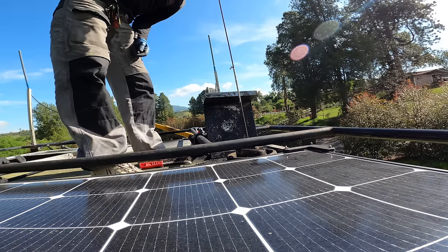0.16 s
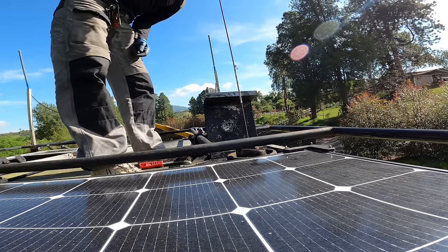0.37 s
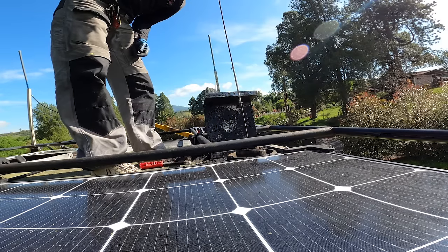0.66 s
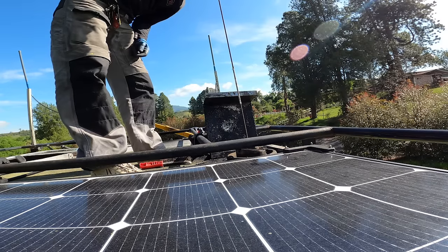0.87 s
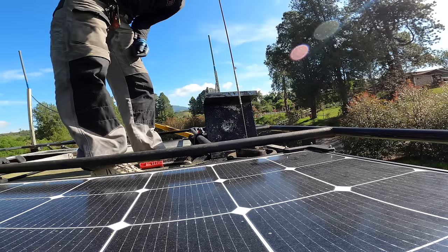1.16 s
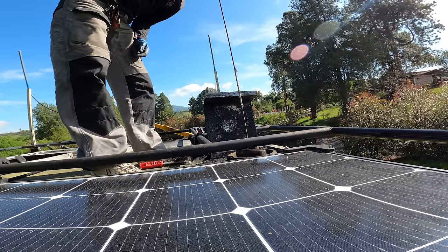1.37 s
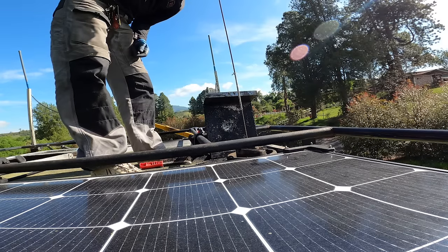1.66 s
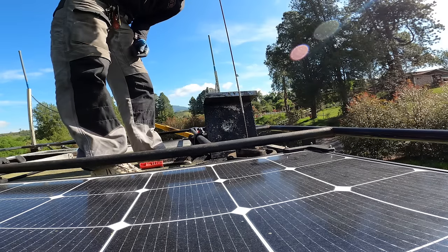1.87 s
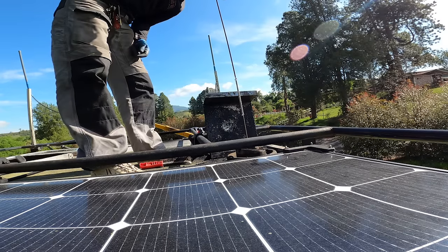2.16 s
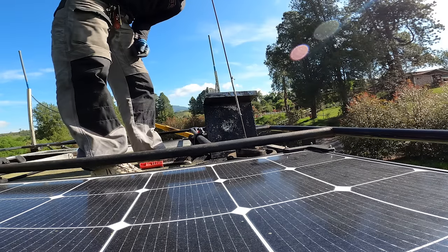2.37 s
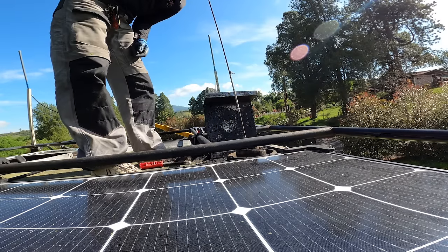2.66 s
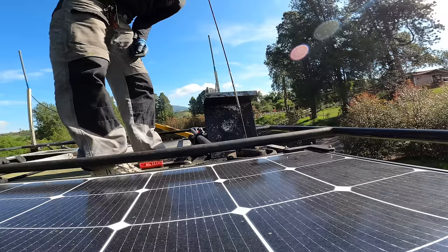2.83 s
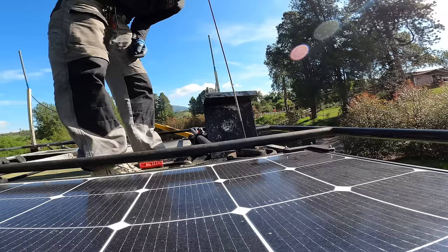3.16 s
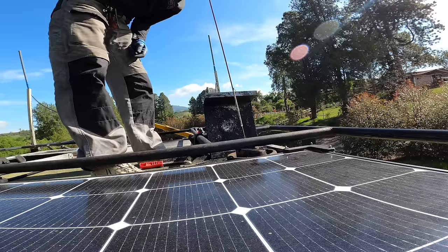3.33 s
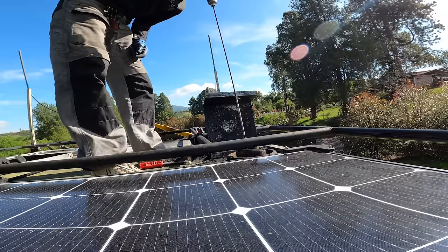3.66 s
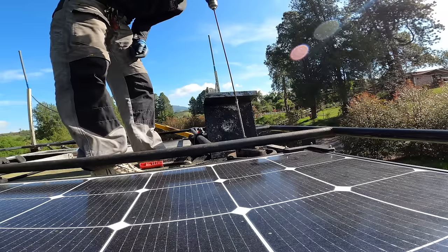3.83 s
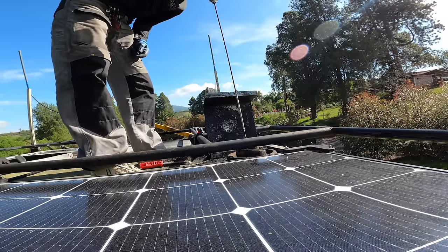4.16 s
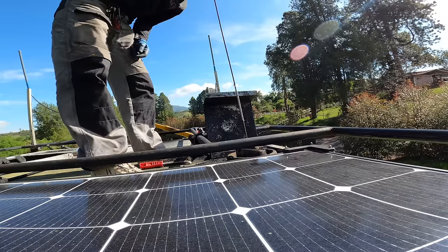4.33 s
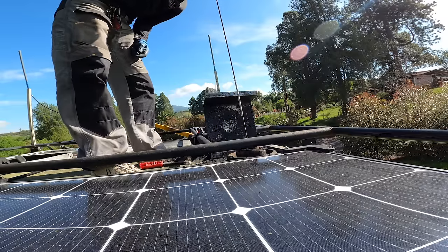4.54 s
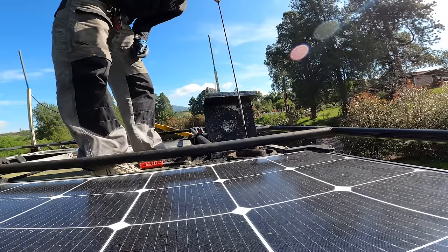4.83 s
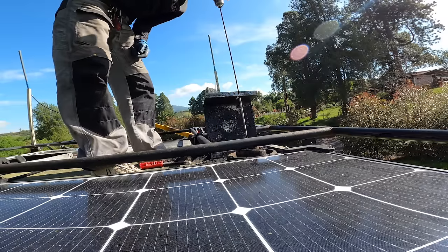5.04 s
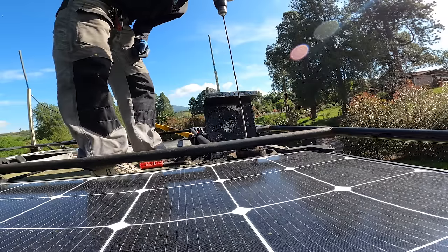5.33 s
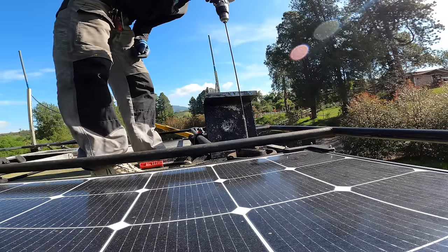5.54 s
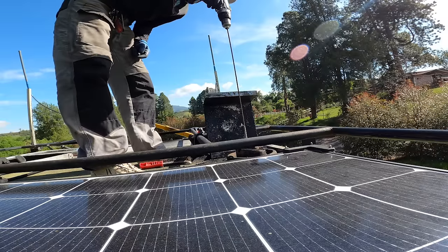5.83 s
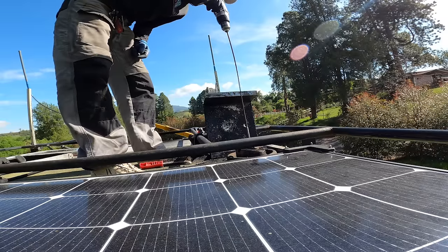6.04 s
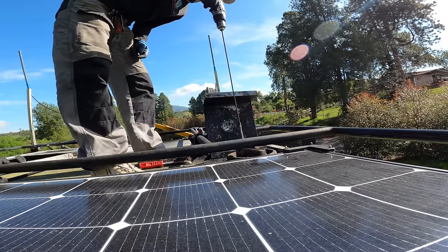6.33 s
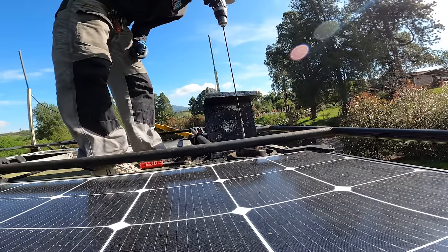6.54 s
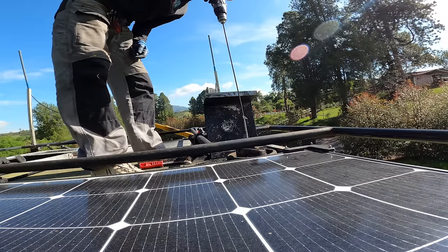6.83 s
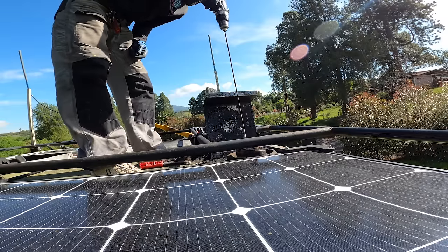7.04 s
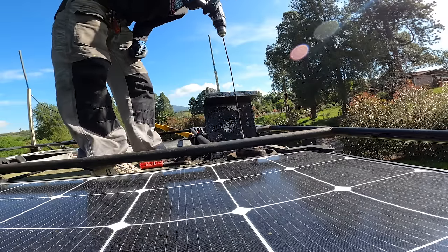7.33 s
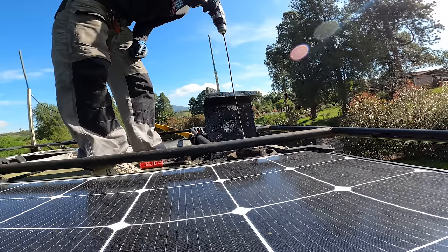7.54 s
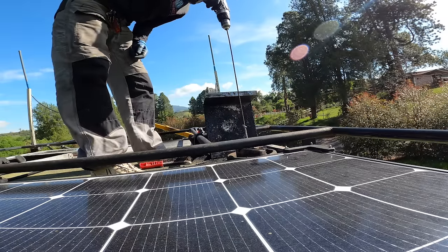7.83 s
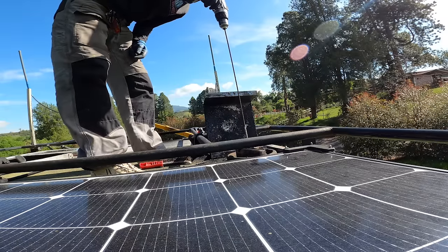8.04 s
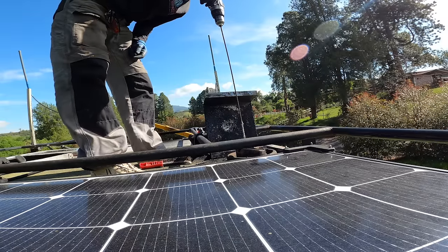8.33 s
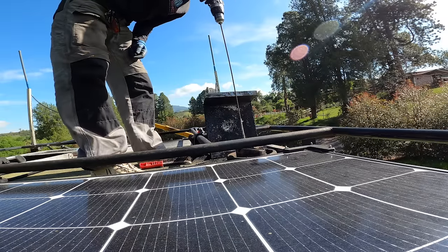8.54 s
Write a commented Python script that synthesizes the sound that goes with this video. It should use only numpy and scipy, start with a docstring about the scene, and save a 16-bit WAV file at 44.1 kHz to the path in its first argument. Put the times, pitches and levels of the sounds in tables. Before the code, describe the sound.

A cordless drill runs on a rooftop in open air, with a high wavering whine and coarse gear rasp. A brush on a long rod scrapes a metal flue in short bursts. The drill gradually gets fainter, speeds up, clatters, stops for a moment with small clicks, then restarts with a squeak and groan into long scraping and rattling. Close stereo microphone, dry.

```python
"""First come the whine and gear rasp of a cordless drill on a roof, its brush already scraping a metal flue.
Tones locked to the rotor make the whine, and noise in bursts once per rotor turn makes the rasp.
The drill grows fainter as it is lowered; it stops for a moment and starts again at a lower speed.
Noise through resonances makes the scraping brush and the whipping rod, which clatters longest at the end.
Dull roof knocks, chuck clicks, a squeak, a groan and faint open air also reach the microphone's two ports."""
import sys
import numpy as np
from scipy import signal
from scipy.fft import rfft, irfft, next_fast_len
from scipy.io import wavfile
from scipy.ndimage import map_coordinates

SR = 44100
rng = np.random.default_rng(int(sys.argv[2]) if len(sys.argv) > 2 else 0)


def master_out(mix):
    """Clip the mix to full scale and print it as 16-bit PCM to the path in sys.argv[1]."""
    frames = np.transpose(np.atleast_2d(mix))
    ceiling = np.clip(frames, -1, 1)
    pcm = np.round(ceiling * 32767).astype(np.int16)
    wavfile.write(sys.argv[1], SR, pcm)


N = 383229
CRUISE = 340  # rotor turns per second


def amp(db):
    """Decibels to gain."""
    return 10 ** (np.asarray(db) / 20)


def unit(x):
    """Scale to rms 1."""
    return x / np.sqrt(np.mean(x ** 2) + 1e-20)


def along(points, hz):
    """Read (frequency [Hz], value) points on a log frequency axis."""
    f, v = np.transpose(points)
    return np.interp(np.log(hz + 1), np.log(f + 1), v)


def curves(rows):
    """One value per sample for each column after the time."""
    s, *columns = np.transpose(rows)
    return [np.interp(np.arange(N) / SR, s, column) for column in columns]


def wobble(rate):
    """A smooth random curve with rate knots a second."""
    coarse = np.linspace(0, N, N // 8)
    knots = rng.standard_normal(int(N * rate / SR) + 4)
    curve = map_coordinates(knots, [coarse * rate / SR])
    return np.interp(np.arange(N), coarse, curve)


def filtered(x, response):
    """Pass x through a complex response of frequency."""
    size = next_fast_len(N + SR // 2)
    hz = np.fft.rfftfreq(size, 1 / SR)
    return irfft(rfft(x, size) * response(hz), size)[..., :N]


def coloured(x, spectrum):
    """Give x a spectrum; white noise keeps its power."""
    return filtered(x, lambda hz: unit(amp(along(spectrum, hz))))


def ringing(x, modes):
    """Drive a body's resonances, of alternating sign, with x; white noise keeps its power."""
    def response(hz):
        total = 0
        for k, (centre, width, db) in enumerate(modes):
            damping = 1j * hz * width
            total = total + (-1) ** k * amp(db) * damping / (centre ** 2 - hz ** 2 + damping)
        return total / np.sqrt(np.mean(abs(total) ** 2))
    return filtered(x, response)


def noise(force=1):
    """Two white noises, shaped in time by force."""
    return force * rng.standard_normal((2, N))


FULL_LOAD_DB, LOAD_LAG_S = -33, .08  # a scrape of this level, held, is a load of 1


def motor_load(drag):
    """The load, about 0-1, follows the drag of the brush with a lag."""
    keep = np.exp(-1 / (LOAD_LAG_S * SR))
    return signal.lfilter([1 - keep], [1, -keep], drag / amp(FULL_LOAD_DB))


# each move of the trigger: (time [s], speed asked for [rotor turns per second], lag [s])
TRIGGER = [(0, 212, .08), (.43, 255, .06), (.475, 297, .078), (.84, 325, .08), (.945, 387, .06),
           (1.28, 342.2, .09), (2.95, 321, .1), (3.27, 342.1, .09), (5.58, 382, .075), (5.99, 335, .3),
           (6.35, 0, .03), (6.617, 160, .022), (6.71, 297, .085)]
START_SPEED, SAG = 200, 5.5  # rotor turns per second; SAG is what a load of 1 costs


def rotor_speed(load):
    """The rotor settles towards each speed that the trigger asks for, and sags under load."""
    speed = np.full(N, float(START_SPEED))
    for s, goal, lag_s in TRIGGER:
        at = round(s * SR)
        speed[at:] = goal + (speed[at] - goal) * np.exp(-np.arange(N - at) / (lag_s * SR))
    return np.maximum(speed - SAG * load, 1)


def line(turns, multiple, flutter_db, slip):
    """One rotor-locked line of rms 1; its level flutters and its phase slips at random (radians)."""
    phase = 2 * np.pi * multiple * turns + slip * (wobble(25) + .5 * wobble(130))
    return unit(amp(flutter_db * wobble(70)) * np.sin(phase))


# main whine, its octave and the high whistle, before drift and load: (time [s], level [dB])
WHINE_LEVEL = [(0, -40.5), (.44, -42.5), (.54, -39), (.61, -50), (.69, -39.5), (.82, -40), (.89, -45),
               (1.02, -37), (1.25, -37), (1.45, -41), (2.2, -40), (2.9, -42.5), (3.24, -38.5), (3.5, -48),
               (4.3, -43), (4.65, -48.5), (5.55, -49), (5.75, -36), (5.97, -35.5), (6.15, -59), (6.74, -70),
               (6.81, -39), (8.69, -43)]
OCTAVE_LEVEL = [(0, -53), (.47, -48), (.53, -35), (.6, -50), (.75, -46), (.95, -58), (5.9, -58), (6.7, -73),
                (7, -49), (7.5, -62)]
WHISTLE_LEVEL = [(.8, -54), (1, -39), (1.06, -64), (1.28, -60), (1.4, -41), (1.7, -48), (2.12, -37.5),
                 (2.35, -50), (3.02, -44), (3.7, -53), (4.65, -43.5), (4.9, -53), (5.12, -47), (5.5, -56),
                 (5.9, -45), (6.5, -83)]
# second gear tone, which beats with the whine: (frequency [Hz], level against the whine [dB])
MESH_LEVEL = [(3000, -10), (3480, 0.5), (3880, -10.5)]
# hum of the unbalanced rotor: (rotor speed [turns per second], level against the motor's [dB])
HUM_LEVEL = [(220, -35), (275, -22), (325, -35), (343, -30), (385, -17.5)]
# weaker motor lines: (multiple of rotor speed, level before colouring [dB])
OVERTONES = [(2, -15.5), (4, -25), (6, -29.5), (9, -20.5), (13, -24.5), (12, -23.5), (21, -26), (22, -25),
             (27, -31)]
# colour of the gear rasp with the drill lowered: (frequency [Hz], relative level per Hz [dB])
RASP_LOWERED = [(100, -51), (800, -20), (2200, 0), (3300, -12), (3900, 5), (4600, 4.5), (5000, 0),
                (5350, -23), (6100, 0.5), (6600, -6), (8300, -7.5), (16000, -18)]
RASP_DB_PER_DECADE = 27  # louder with speed
LOAD_MUTES_DB = 10  # what a load of 1 takes from the gear tones, pressing the teeth together
DRIFT_DB = 1  # slow random swell of whine, mesh and whistle


def whine(turns, speed, load, facing_db):
    """Gear tones locked to the rotor fade under load; the motor's hum and overtones grow with speed."""
    main, mesh, whistle = 10, 10.17, 23  # multiples of the rotor speed
    gears = line(turns, main, flutter_db=0.6, slip=0.45)
    gears += amp(along(MESH_LEVEL, mesh * speed)) * line(turns, mesh, flutter_db=3, slip=1.1)
    gears *= amp(curves(WHINE_LEVEL)[0] + DRIFT_DB * wobble(4.2))
    whistle_gain = amp(curves(WHISTLE_LEVEL)[0] + DRIFT_DB * wobble(12))
    gears += whistle_gain * line(turns, whistle, flutter_db=2.5, slip=0.8)
    gears += amp(curves(OCTAVE_LEVEL)[0]) * line(turns, 2 * main, flutter_db=0, slip=0.76)

    hum = amp(along(HUM_LEVEL, speed)) * line(turns, 1, flutter_db=0.5, slip=0.11)
    overtones = sum(amp(db) * line(turns, multiple, flutter_db=2.5, slip=.5) for multiple, db in OVERTONES)
    motor_db = facing_db + RASP_DB_PER_DECADE * np.log10(speed / CRUISE)
    motor = amp(motor_db) * (hum + coloured(overtones, RASP_LOWERED))
    return amp(-LOAD_MUTES_DB * load) * gears + motor


# colours of the gear rasp before lowering and of the growl: (frequency [Hz], relative level per Hz [dB])
RASP = [(100, -51), (800, -25), (2200, -2.5), (3000, -13.5), (3700, -2), (4400, -0.5), (5000, -4),
        (5700, 0.5), (6600, -11.5), (7700, -6.5), (8800, -13), (12500, -18.5), (14200, -21), (16000, -11)]
GROWL = [(30, -38), (200, -26), (420, -9), (650, -10.5), (800, -20), (1250, -12.5), (1600, -4), (2000, 4.5),
         (2500, -4), (3100, -10), (3600, 3), (4200, 3.5), (4800, -7), (6000, -35.5)]
# change of colour as the drill is lowered: (time [s], share of the way)
LOWERING = [(.8, 0.02), (3.5, 0), (5.6, 0.36)]
# growl at either end of that way: factor on its frequencies, and level [dB]
GROWL_SHIFT_BEFORE, GROWL_SHIFT_LOWERED = 0.91, 1.17
GROWL_BEFORE_DB, GROWL_LOWERED_DB = -3.1, 0.5


def gearbox(turns, speed, rasp_db):
    """Teeth rub in uneven bursts, once per rotor turn; the housing growls more at high speed."""
    def teeth():
        return unit(amp(0.5 * wobble(600) + 1.01 * wobble(110) + .5 * np.sin(2 * np.pi * turns)))

    def shifted_growl(shift):
        return coloured(noise(grind), [(hz * shift, db) for hz, db in GROWL])

    # the planet carrier turns more slowly than the rotor
    carrier = amp(.5 * np.sin(2 * np.pi * turns / 5.0) + 0.62 * wobble(22))
    pace_offset = np.clip(speed / CRUISE, .6, 1.2) - 1
    lowered = np.clip(curves(LOWERING)[0], 0, 1)
    before_gain, lowered_gain = np.sqrt(1 - lowered), np.sqrt(lowered)
    rub, grind = teeth(), teeth()
    rasp = before_gain * coloured(noise(rub), RASP)
    rasp += lowered_gain * coloured(noise(rub), RASP_LOWERED)
    growl = amp(GROWL_BEFORE_DB) * before_gain * shifted_growl(GROWL_SHIFT_BEFORE)
    growl += amp(GROWL_LOWERED_DB) * lowered_gain * shifted_growl(GROWL_SHIFT_LOWERED)
    return amp(rasp_db) * carrier * (rasp + amp(2.6 * pace_offset) * growl)


# colour of the open air: (frequency [Hz], relative level per Hz [dB])
AIR = [(25, -11), (150, -7), (420, 2.5), (700, -15), (2000, -5), (5500, -9), (9000, -18), (15000, -33)]


def open_air(level_db):
    """Faint steady noise of the open air around the roof."""
    return amp(level_db) * coloured(noise(), AIR)


# the brush catches on the wall: (time [s], length [s], bristle force [dB], rod chatter force [dB])
SCRAPES = [(0, 0.21, -40, -41), (0.243, 0.11, -46.5, -42), (0.4, 0.1, -45, -41), (1.377, 0.079, -44.5, -53),
           (1.509, 0.1, -42, -59), (1.849, 0.18, -42.5, -58), (2.558, 0.073, -47.5, -62),
           (2.692, 0.055, -42, -43), (3.662, 0.25, -45, -45.5), (3.73, 0.094, -40.5, -53),
           (3.985, 0.11, -50.5, -44), (4.35, 0.11, -45, -46), (4.471, 0.055, -44.5, -52),
           (5.687, 0.318, -68, -47), (5.97, 0.08, -50, -38), (6.036, 0.31, -33.5, -33.5),
           (7.176, .06, -46, -33), (7.224, 0.31, -33.5, -31.5), (7.541, 0.46, -35, -37),
           (8.007, 0.67, -36.5, -41)]
SCRAPE_ATTACK_S, SCRAPE_RELEASE_S, SCRAPE_FADE_DB_PER_S = 0.0202, 0.0221, 5.5


def scrapes():
    """Force of bristles and of rod chatter: each scrape bites, slowly eases and lets go."""
    power = np.zeros((2, N + 2 * SR))
    for s, length, bristles_db, chatter_db in SCRAPES:
        t = np.arange(int(length * SR) + SR // 4) / SR
        bite = np.minimum(t / SCRAPE_ATTACK_S, 1)
        release = np.exp(-np.maximum(t - length, 0) / SCRAPE_RELEASE_S)
        shape = bite * amp(-SCRAPE_FADE_DB_PER_S * t) * release
        at = max(round(s * SR), 0)
        power[:, at:at + len(t)] += (amp([[bristles_db], [chatter_db]]) * shape) ** 2
    return np.sqrt(power[:, :N])


# resonances of the flue pipe and of the rod: (frequency [Hz], width [Hz], level [dB])
PIPE = [(39.6, 6.4, -8.5), (66.5, 22.3, -1.5), (90, 32, 0), (116.3, 27.6, 2), (167, 64, -4), (213, 43, -4),
        (278, 61, -3.5), (350, 142, -10), (454.6, 29.4, -1.5), (628, 81, -6), (991, 59, -2),
        (1480, 212, -5)]
ROD = [(993, 38, 3.5), (1684, 85, -3.5), (2793, 360, 2.5), (3067, 300, 5.5), (4450, 130, -24),
       (4880, 200, -3.5), (7760, 300, -13.5), (9700, 5300, -26.5)]
# colour of the crack of blows and clicks: (frequency [Hz], relative level per Hz [dB])
CRACK = [(100, -9), (900, -5), (1550, -1), (3200, -3), (4600, 2), (6200, -15.5), (15000, -22)]


def sweep(turns, brush_force, chatter_force):
    """Bristles and rod catch on the pipe wall in clumps, twice per turn of the rod; single strikes ring on top."""
    crack_force, rod_force, pipe_force, ring = strikes(crack_s=0.0043, scuff_s=0.01, boom_s=0.009, rise_s=0.00076)
    rod_turns = turns / 15.2  # the gears slow the rod
    catch_db = 1.0 * np.sin(4 * np.pi * rod_turns) + 2 * wobble(120)
    bristles = brush_force * unit(amp(catch_db + 1.75 * wobble(30) + 1.94 * wobble(500)))
    chatter = chatter_force * unit(amp(catch_db + 2.1 * wobble(260)))
    pipe = ringing(noise(np.hypot(bristles, pipe_force)), PIPE)
    rod = ringing(noise(np.hypot(chatter, rod_force)), ROD)
    crack = coloured(noise(np.hypot(amp(-6.0) * chatter, crack_force)), CRACK)
    centred_ring = ring * np.array([[1], [0]])  # only in the part that both ports share
    return centred_ring + pipe + rod + crack


# blows of the rod on the pipe, and four faint clicks of the chuck around the stop and restart (6.456-6.645 s),
# levels before the offsets below: (time [s], crack [dB], ring of the rod [dB], clang of the pipe [dB])
STRIKES = [(.063, -10, -36, -39), (0.092, -13, -36, -38), (.129, -12, -22.5, -29), (3.68, -12, -42, -53),
           (3.696, -14, -36, -49), (3.733, -9, -42, -46), (3.747, -21, -23.5, -44), (3.757, -11, -42, -49),
           (3.771, -10, -36, -41), (3.785, -9, -42, -41), (3.809, -5.5, -38, -41), (3.852, -11.5, -44, -41),
           (4.363, -34, -48, -36), (4.421, -15.5, -44, -38), (6.047, -17, -27, -33), (6.061, -19, -28, -35),
           (6.078, -16, -23.5, -33), (6.105, -22, -22.5, -26), (6.121, -26, -26, -27),
           (6.142, -17, -22.5, -31), (6.166, -15, -22, -34), (6.178, -26, -21.5, -32),
           (6.227, -23, -22, -38), (6.242, -24, -24, -35), (6.293, -19, -26, -28), (6.337, -28, -32, -35),
           (6.456, -36, -60, -68), (6.499, -40, -60, -66), (6.621, -34, -56, -66), (6.645, -28, -45, -62),
           (7.26, -25, -25, -33), (7.334, -16.5, -26, -25.5), (7.362, -17, -22, -38),
           (7.435, -18, -21, -44), (7.483, -22, -21, -37), (7.533, -15, -24, -42), (7.609, -13, -30, -32),
           (7.663, -18, -34, -32.5), (7.726, -20, -24, -34), (7.746, -25, -24.5, -33),
           (7.791, -24, -25.5, -32.5), (7.838, -28, -28, -40), (7.893, -25, -22.5, -29),
           (7.94, -15, -28, -27), (8.031, -14, -24, -27), (8.094, -23, -27, -34), (8.14, -17, -23, -26),
           (8.187, -14, -20, -26), (8.233, -23, -24, -30), (8.28, -14, -24, -38),
           (8.348, -16.5, -23.5, -42), (8.38, -16, -29, -33), (8.401, -16, -26, -34),
           (8.448, -20, -21.5, -34), (8.483, -24, -26, -36), (8.501, -15, -24, -27), (8.551, -12, -24, -32),
           (8.585, -21, -26.5, -34), (8.604, -17, -35, -31), (8.652, -14.5, -22.5, -35),
           (8.663, -18.5, -31, -40)]
# what a strike rings, first the rod, then the pipe: (frequency [Hz], rise [s], decay [s], level offset [dB])
RINGS = [(3024, .0007, 0.0038, 2.5), (999, 0.0035, 0.011, 3)]
RING_SCATTER = .022  # spread of the pitch from strike to strike, as a fraction
CRACK_DB, SCUFF_DB, BOOM_DB = -12.5, -5, -4  # offsets for the crack, the rod's scuff and the pipe's boom


def strikes(crack_s, scuff_s, boom_s, rise_s):
    """Each blow or chuck click cracks, scuffs, booms and rings, at a pitch that varies from one to the next."""
    t = np.arange(SR // 8) / SR
    out = np.zeros((4, N + SR))
    rise = 1 - np.exp(-t / rise_s)
    detunes = 1 + RING_SCATTER * rng.standard_normal((len(STRIKES), 2))
    for (s, crack_db, rod_db, pipe_db), detune in zip(STRIKES, detunes):
        ring = np.zeros(len(t))
        for (hz, attack, decay, db), level, shift in zip(RINGS, (rod_db, pipe_db), detune):
            envelope = (1 - np.exp(-t / attack)) * np.exp(-t / decay)
            ring += amp(level + db) * envelope * np.sin(2 * np.pi * hz * shift * t)
        crack = amp(crack_db + CRACK_DB) * rise * np.exp(-t / crack_s)
        scuff = amp(rod_db + SCUFF_DB) * rise * np.exp(-t / scuff_s)
        boom = amp(pipe_db + BOOM_DB) * rise * np.exp(-t / boom_s)
        at = round(s * SR)
        out[:, at:at + len(t)] += [crack, scuff, boom, ring]
    return out[:, :N]


# dull knocks through the roof: (time [s], level before the decay [dB], frequency [Hz])
THUDS = [(.063, -26, 170), (.132, -25, 160), (1.53, -28, 120), (2.027, -32, 110), (2.198, -24.5, 130),
         (2.238, -31, 90)]


def thuds(decay_s):
    """The roof gives one heavily damped swing per knock."""
    out, t = np.zeros(N), np.arange(SR // 10) / SR
    for s, db, hz in THUDS:
        swing = amp(db) * np.sin(2 * np.pi * hz * t) * np.exp(-t / decay_s)
        out[round(s * SR):][:len(t)] += swing
    return out


# bristles slide around a bout of clatter: (time of the peak [s], rise [s], fall [s], level at cruise [dB])
SLIDES = [(3.79, 0.14, 0.34, -37), (6.05, 0.33, 0.22, -37.5), (7.17, 0.032, 0.28, -33)]
# colour of the sliding: (frequency [Hz], relative level per Hz [dB])
HISS = [(500, -3), (2500, 5), (4700, 6.5), (6500, 0), (9000, -2), (12000, -2), (15000, -15)]


def slide(pace):
    """A bright hiss, as of bristles sliding along the wall, swells and fades, louder with speed."""
    t = np.arange(N) / SR
    force = np.zeros(N)
    for s, rise_s, fall_s, db in SLIDES:
        force += amp(db) * np.exp(-np.maximum((s - t) / rise_s, (t - s) / fall_s))
    return pace * force * coloured(noise(unit(amp(1.9 * wobble(400)))), HISS)


# arching groan around the restart, and thin squeak just before it: (time [s], frequency [Hz], level [dB])
GROAN = [(6.49, 427, -70), (6.52, 417, -72), (6.63, 405, -65), (6.652, 505, -51), (6.68, 524, -53),
         (6.74, 373, -60), (6.8, 310, -70)]
SQUEAK = [(6.58, 4870, -53), (6.586, 7040, -56), (6.598, 8400, -57), (6.608, 8900, -78)]


def chirps():
    """A squeak just before the drill restarts and a groan around the restart: gliding sines with a rough level."""
    t, out = np.arange(N) / SR, np.zeros(N)
    for glide in (SQUEAK, GROAN):
        hz, db = curves(glide)
        sounding = (t > glide[0][0]) * (t < glide[-1][0])
        out += sounding * amp(db) * np.sin(2 * np.pi * np.cumsum(hz) / SR)
    return out * unit(amp(2.7 * wobble(300)))


# likeness of the two microphone ports: (frequency [Hz], correlation)
ALIKE = [(100, .985), (1000, .975), (2000, .96), (4500, .9), (6000, .85), (7000, .6), (8500, .62),
         (12000, .5), (15000, .4)]


def spread(pair):
    """Share two noises between the ports: alike in the bass, less so in the treble."""
    def shares(hz):
        turn = np.arccos(np.clip(along(ALIKE, hz), -1, 1)) / 2
        return np.array([np.cos(turn), np.sin(turn)])
    mid, side = filtered(pair, shares)
    return np.array([mid + side, mid - side])


# the drill grows fainter as it is lowered towards the pipe: (time [s], level at cruise [dB])
DRILL_LEVEL = [(0, -29), (.7, -33), (1.3, -33.5), (3.3, -36), (5.2, -39), (5.9, -38.5), (6.8, -40.5),
               (7.2, -39.5), (7.7, -41), (8.69, -42)]
# light touch of the brush on the wall all the time: (time [s], force at cruise [dB])
LIGHT_TOUCH = [(0, -52), (2.9, -53), (3.2, -56), (4.7, -55.5), (5, -74.5), (8.69, -64)]
LOAD_DAMPS_DB = 3  # what a load of 1 takes from the rasp


def scene():
    """The drill and the flue in faint open air; trigger and drag set the speed, and the speed drives the drill."""
    drag, chatter = scrapes()
    load = motor_load(drag)
    speed = rotor_speed(load)
    pace = speed / CRUISE
    unsteady_speed = speed * (1 + .0009 * wobble(18) + .0015 * wobble(4))
    turns = np.cumsum(unsteady_speed) / SR
    facing_db, = curves(DRILL_LEVEL)
    effort = amp(RASP_DB_PER_DECADE * np.log10(pace))
    gears = effort * gearbox(turns, speed, facing_db - LOAD_DAMPS_DB * load)
    brush = np.hypot(drag, pace * amp(curves(LIGHT_TOUCH)[0]))
    noises = gears + sweep(turns, brush, chatter) + slide(pace) + open_air(level_db=-65)
    return spread(noises) + whine(turns, speed, load, facing_db) + chirps() + thuds(decay_s=0.0033)


# the microphone fades in the top octave: (frequency [Hz], level [dB])
TREBLE = [(9000, 0), (12500, 1), (14000, -2), (15800, -18)]
# colour of the left port against the right: (frequency [Hz], left minus right [dB])
LEAN = [(100, 2), (800, -2.5), (2500, 1.8), (4200, 1.2), (5100, 3.5), (6400, -2.5), (7100, -6),
        (7800, -5.5), (8500, -3.5), (10400, -8.5), (14000, 0.5), (16000, 2)]
TOP_HZ = 15750  # nothing passes from here up


def record(dry):
    """Each microphone port has its own colour, sound reaches the left one slightly later, and the top is cut."""
    sides = np.array([[.5], [-.5]])  # left, right
    lag_s = 1.7 / SR

    def ports(hz):
        colour = amp(along(TREBLE, hz) + sides * along(LEAN, hz))
        delay = np.exp(-2j * np.pi * hz * lag_s * sides)
        return colour * delay * (hz < TOP_HZ)
    return filtered(dry, ports)


dry = scene()
out = record(dry)
master_out(out)
```